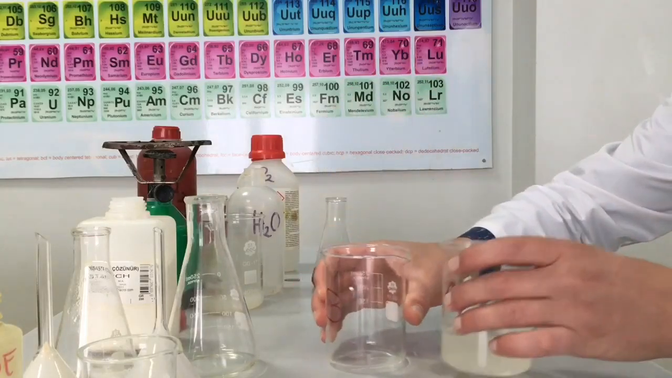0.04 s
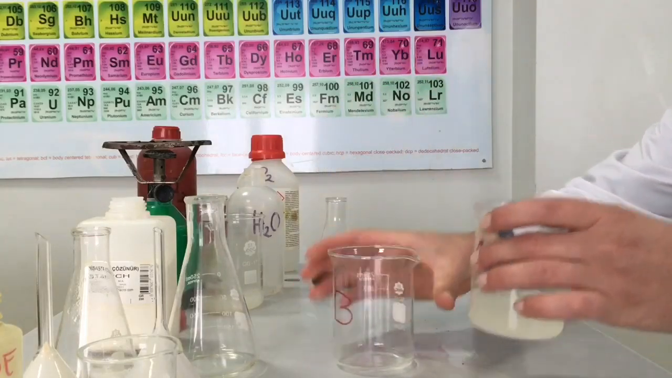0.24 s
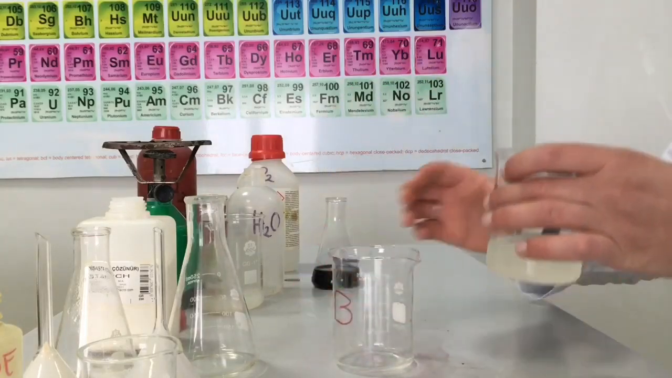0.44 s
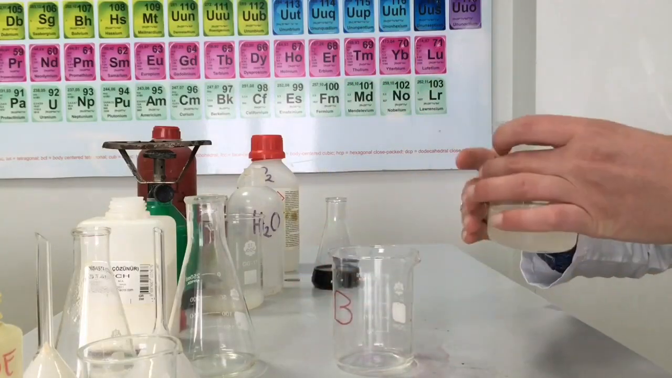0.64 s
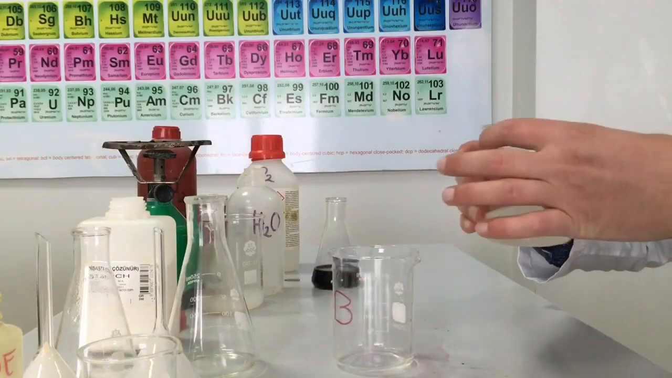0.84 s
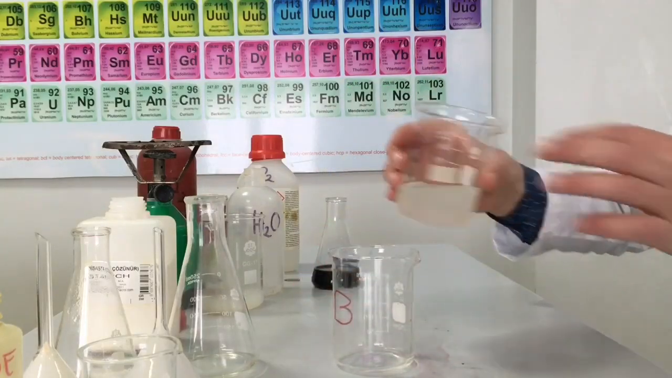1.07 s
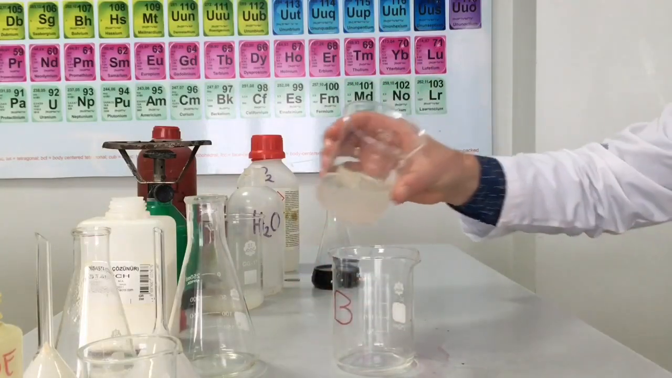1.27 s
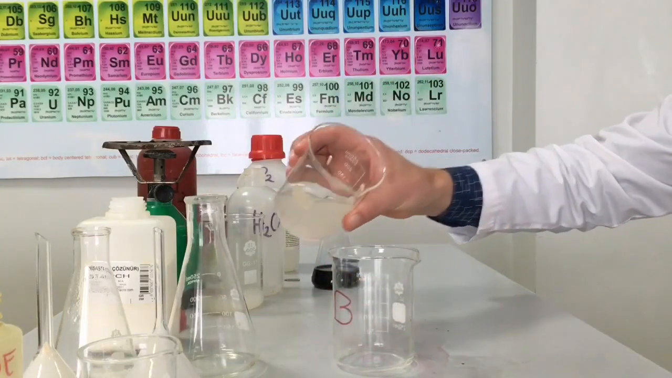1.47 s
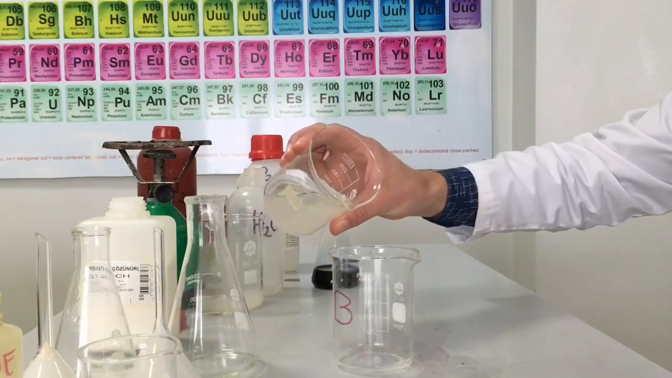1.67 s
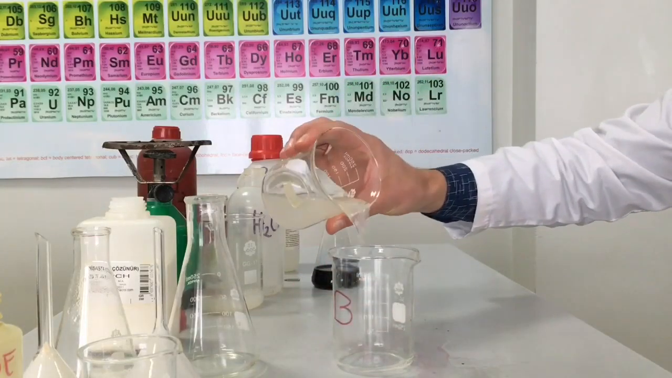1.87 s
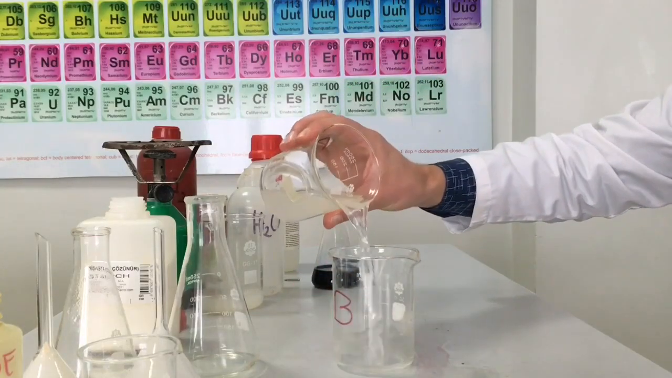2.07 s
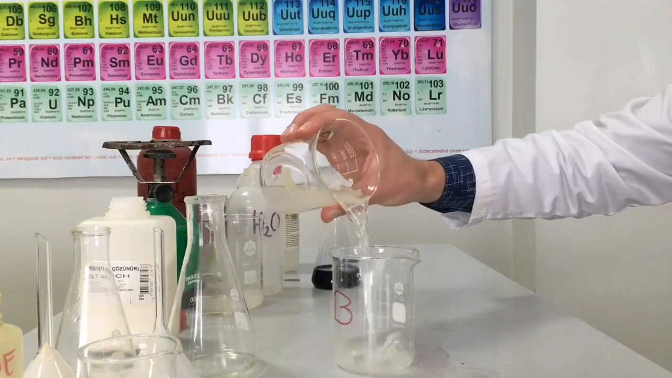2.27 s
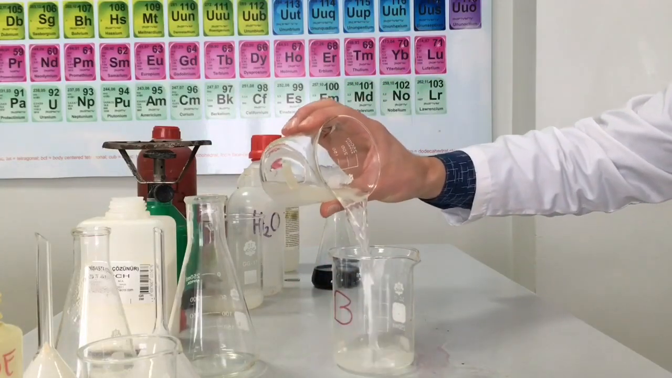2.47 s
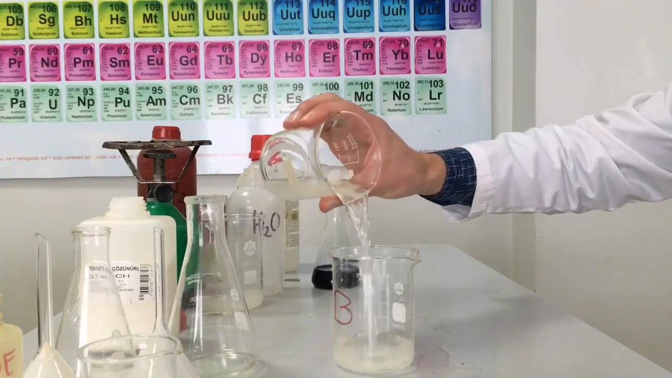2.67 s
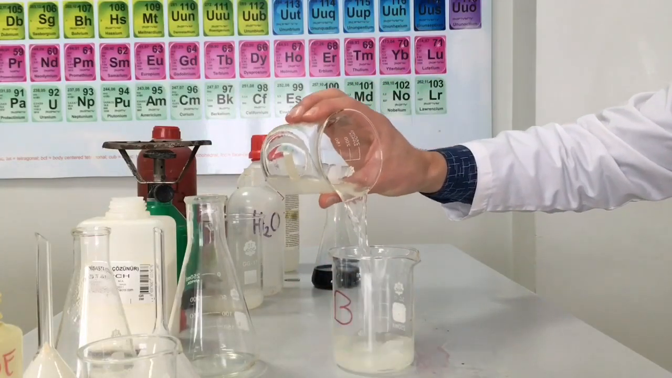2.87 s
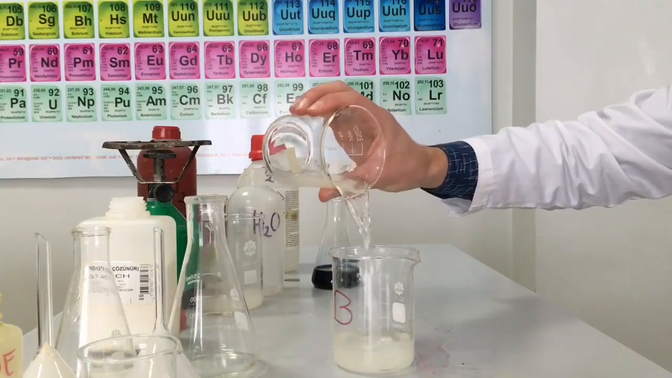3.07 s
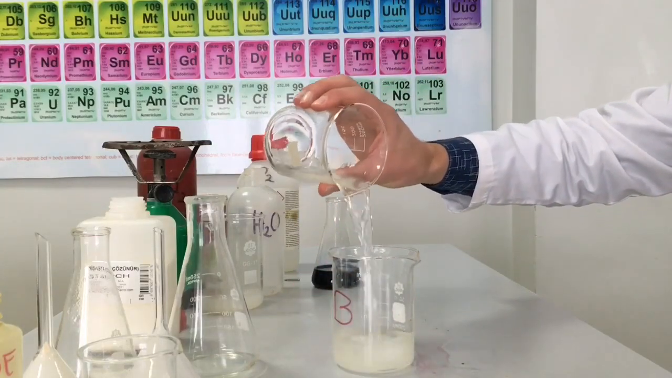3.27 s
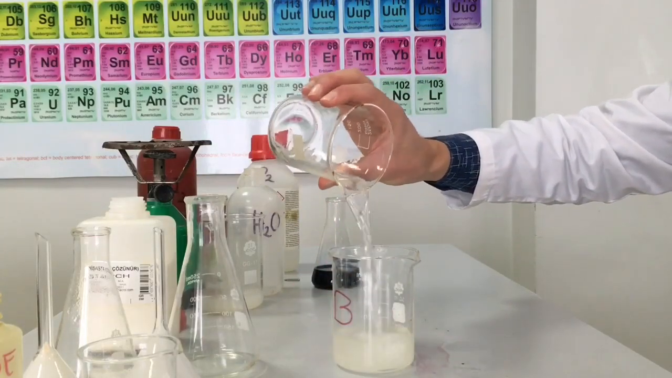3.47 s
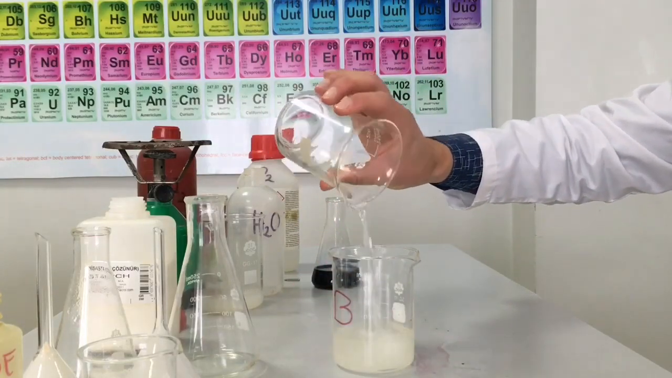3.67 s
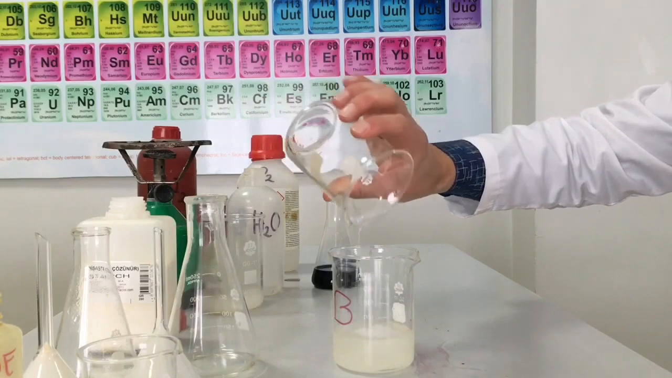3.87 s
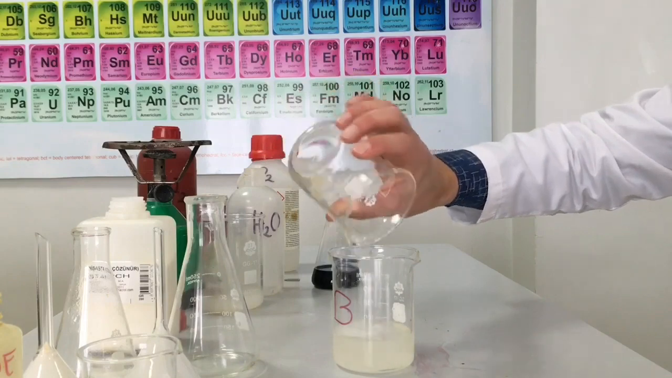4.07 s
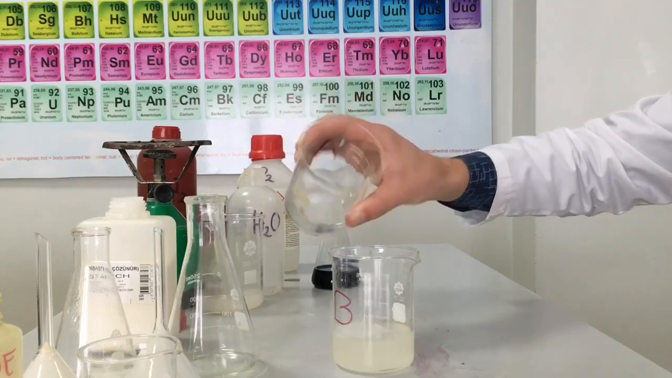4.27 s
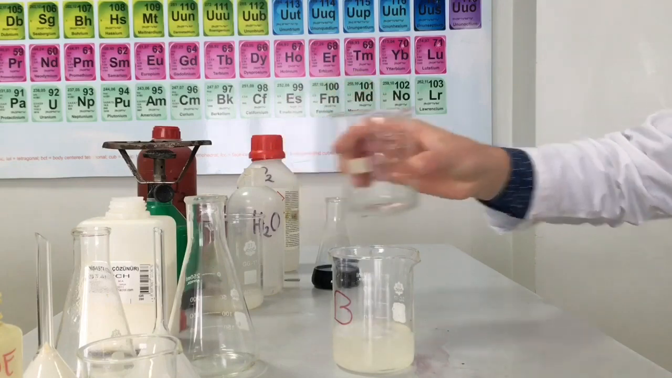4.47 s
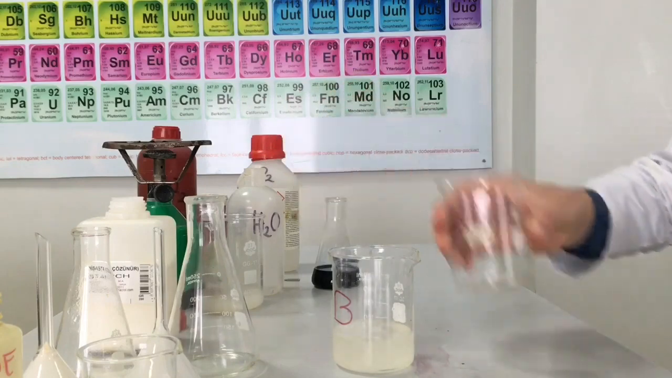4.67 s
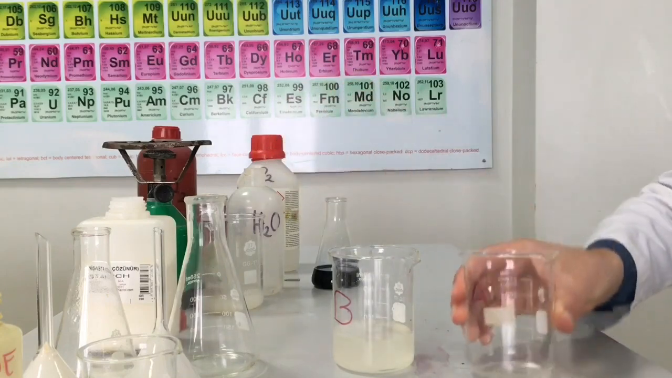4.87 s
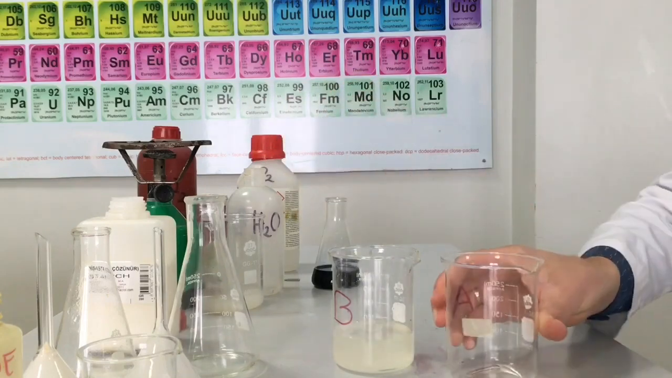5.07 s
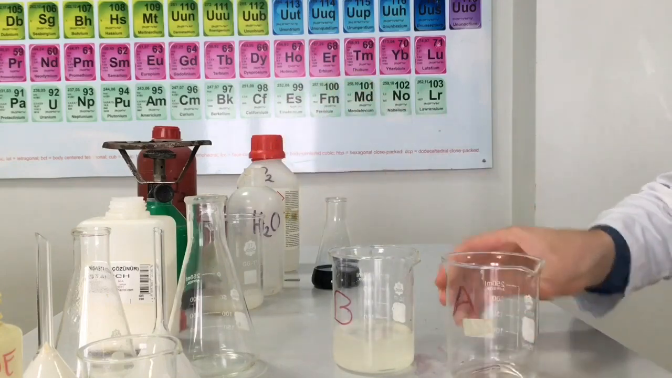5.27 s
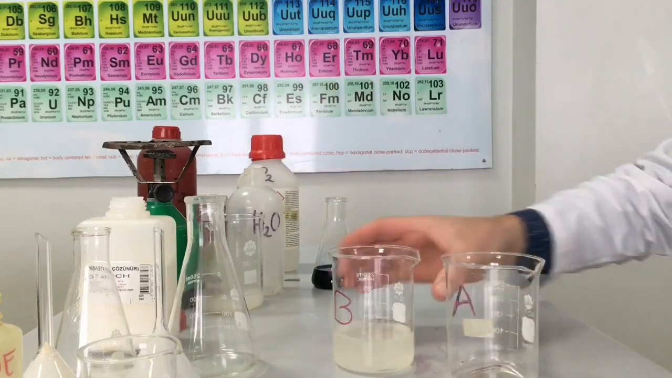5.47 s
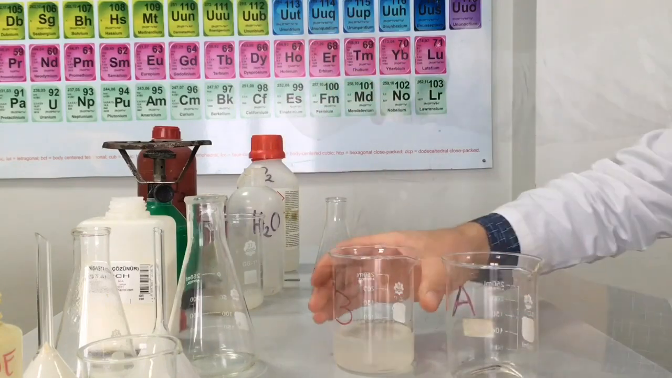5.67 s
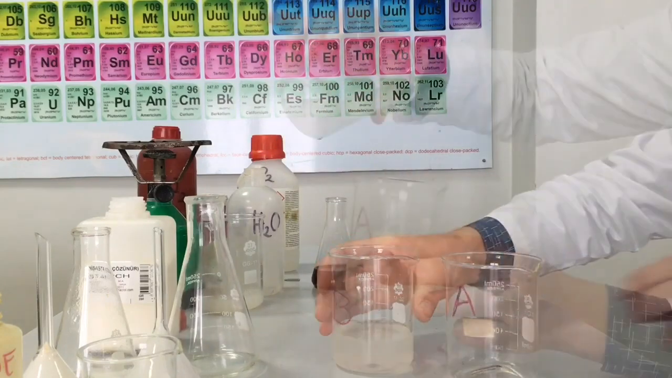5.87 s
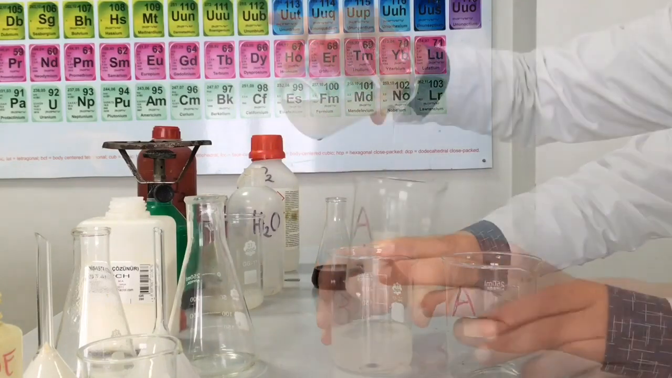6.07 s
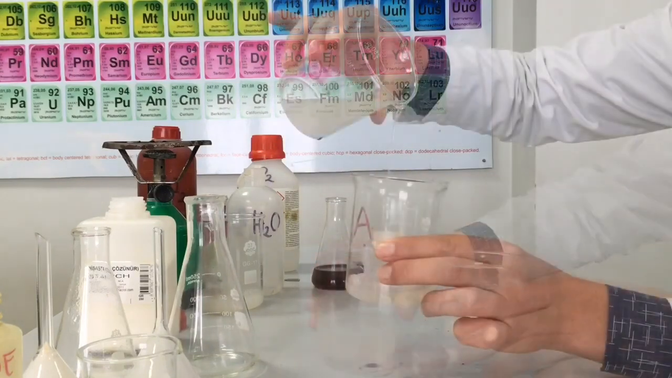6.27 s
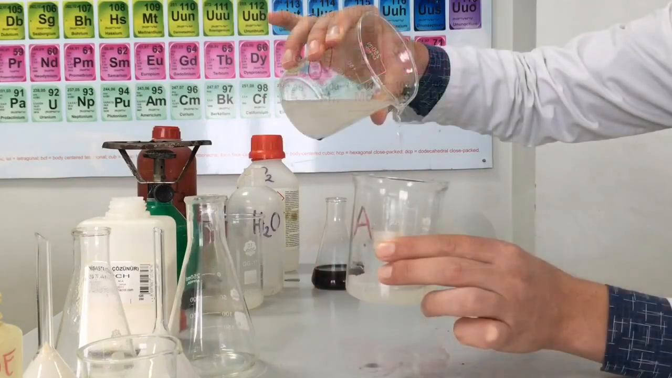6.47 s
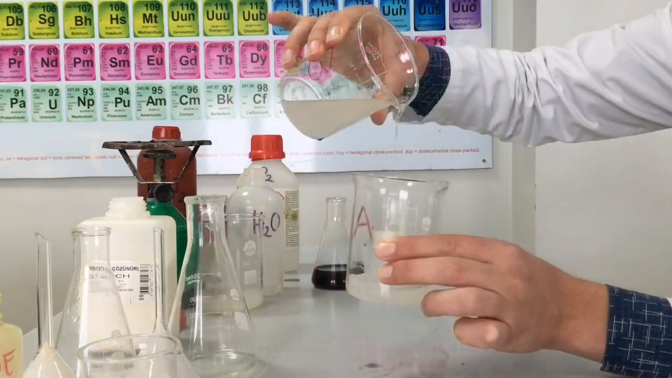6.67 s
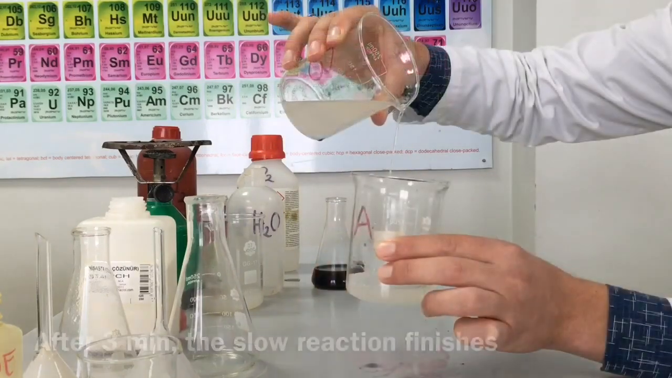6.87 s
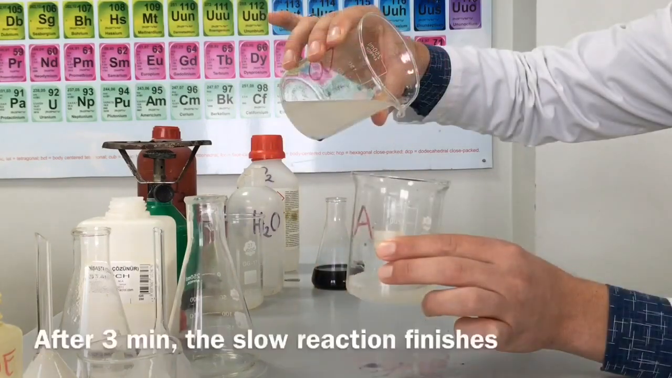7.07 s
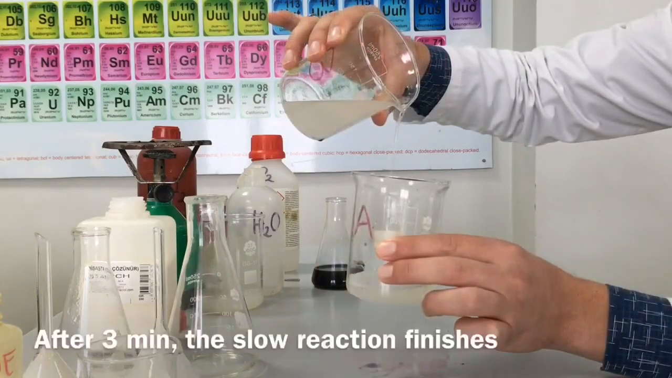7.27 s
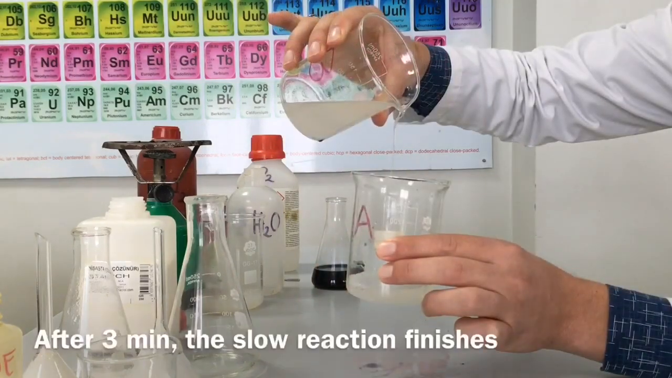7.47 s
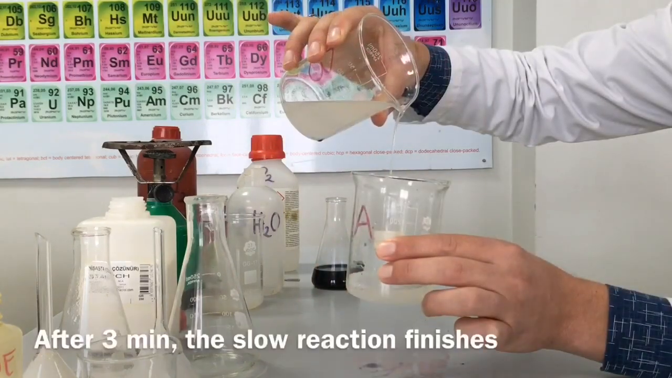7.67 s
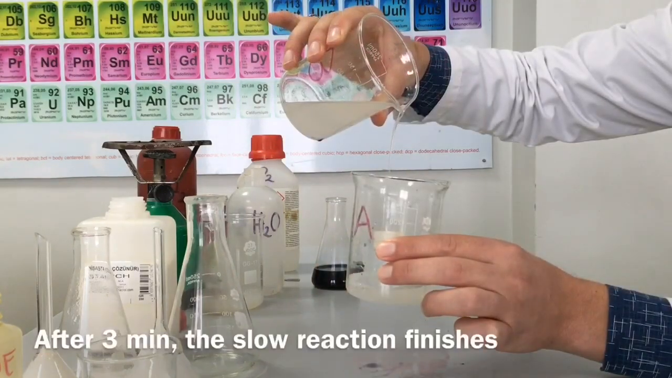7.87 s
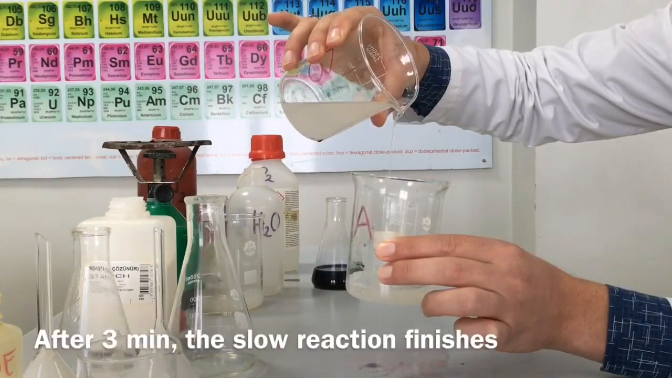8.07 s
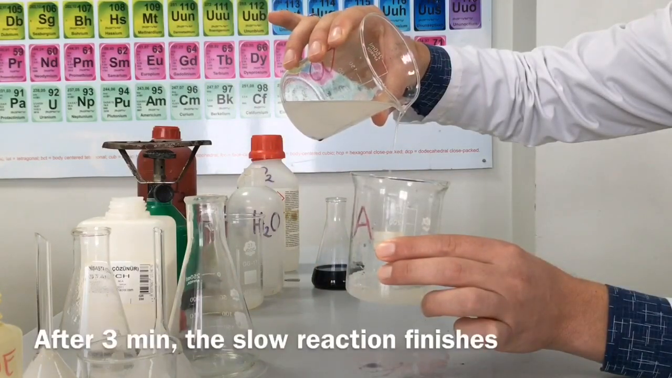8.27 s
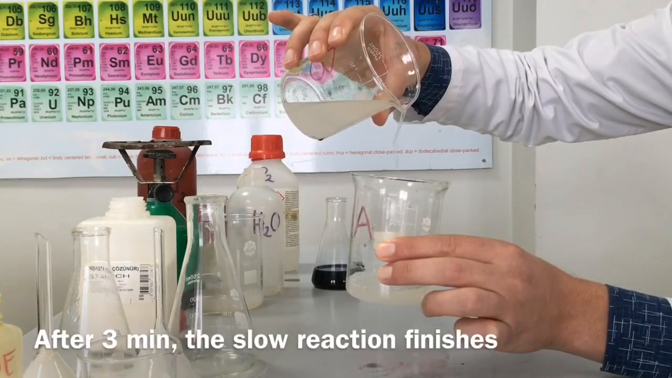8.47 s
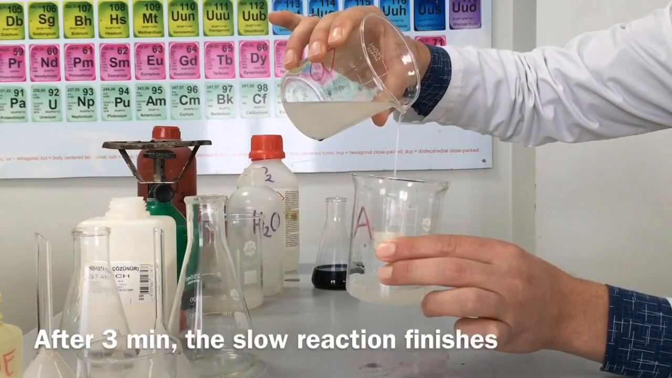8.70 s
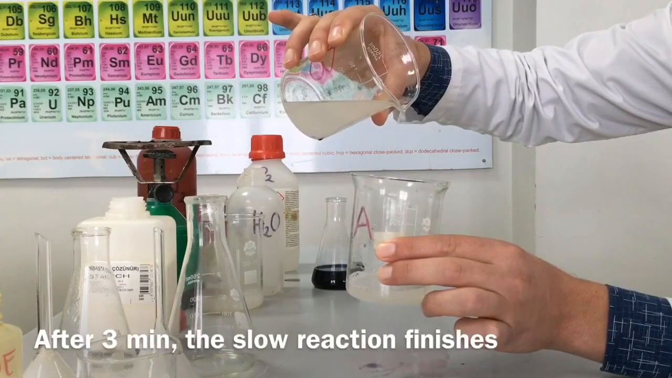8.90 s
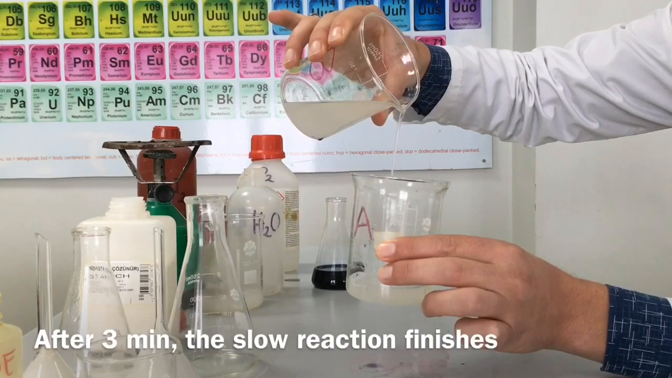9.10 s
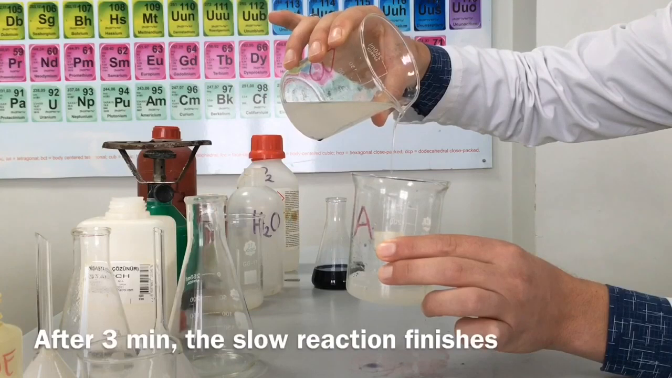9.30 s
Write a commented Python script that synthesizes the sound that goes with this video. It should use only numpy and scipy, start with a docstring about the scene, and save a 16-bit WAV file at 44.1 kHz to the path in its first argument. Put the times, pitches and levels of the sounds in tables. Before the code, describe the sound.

Liquid gurgles and splashes into a glass beaker, an empty beaker knocks down on a bench, then a thin trickle drips into glass.

```python
"""Liquid is poured into a glass beaker, gurgling and fizzing as trapped air bubbles ring.
The empty beaker is set down on a lab bench with a knock and rocks back, shaking bench and glass.
Then a thin trickle drips into a held glass and rings its wall. Faint tinkles, a rustling sleeve
and a short scrape come from the handling. The hard room echoes, and the ventilation hums."""
import sys
import numpy as np
from scipy import signal
from scipy.fft import rfft, irfft
from scipy.io import wavfile
from scipy.ndimage import uniform_filter1d

SR = 44100
rng = np.random.default_rng(int(sys.argv[2]) if len(sys.argv) > 2 else 0)


def digitize_waveform(pressure):
    """Quantize a signal to 16-bit integers and store it at the path in sys.argv[1].

    Rows of a 2-D input are taken as channels; values are limited to [-1, 1].
    """
    field = np.atleast_2d(pressure).T
    bounded = np.clip(field, -1, 1)
    quanta = np.round(bounded * 32767).astype(np.int16)
    wavfile.write(sys.argv[1], SR, quanta)


N = 411894
LEAD = SR // 2  # extra samples before time zero, so an earlier sound can leave its echo
WALL_HZ = 3145  # the note of the glass that catches the liquid

# The poured stream. Each row: time in seconds, then deep gurgle, gurgle and fizz levels in dB.
STREAM = [(2.15, -75, -84, -90), (2.22, -89, -96, -63), (2.4, -72, -57, -70.5), (2.47, -67, -63, -70),
          (2.49, -58.5, -61, -59), (2.8, -73, -58, -61.5), (2.96, -88, -52.5, -65.5),
          (3.05, -58, -43.5, -66), (3.37, -56, -47, -65), (3.7, -54.5, -60.5, -69.5),
          (3.89, -57, -47.5, -69.5), (4.2, -106, -103, -101.5)]


def amp(db):
    """Turn decibels into a number to multiply by."""
    return 10 ** (np.asarray(db) / 20)


def evened(x):
    """Scale a signal to an average (rms) level of 1."""
    return x / np.sqrt(np.mean(x ** 2) + 1e-20)


def value_at(points, hz):
    """Read between the rows of a table of pitches and values."""
    pitch, value = np.transpose(points)
    return np.interp(np.log(hz + 1), np.log(pitch + 1), value)


def between(ends, share):
    """A pitch part of the way, in octaves, from one end to the other."""
    return ends[0] * (ends[1] / ends[0]) ** share


def add(mix, s, sound):
    """Mix in a sound starting at s seconds."""
    part = mix[LEAD + round(s * SR):][:len(sound)]
    part += sound[:len(part)]


def curves(rows):
    """Turn rows of seconds and dB levels into volume curves that fade at both ends."""
    s, *columns = np.transpose(rows)
    t = (np.arange(N + LEAD) - LEAD) / SR
    gate = np.clip(np.minimum(t - s[0], s[-1] - t) / 0.021, 0, 1)
    return [gate * amp(np.interp(t, s, db)) for db in columns]


def ring(hz, t60, glide=0, rise=0.00078):
    """A tone that fades by 60 dB in t60 seconds (its fade time) while its pitch rises by the share glide."""
    t = np.arange(int(t60 * SR) + 50) / SR
    envelope = amp(-60 * t / t60) * (1 - np.exp(-t / rise))
    return envelope * np.sin(2 * np.pi * hz * (t + glide * t ** 2 / (2 * t60)))


def rattle(colour, t60):
    """A dying burst of noise, shaped by a table of pitches and levels."""
    t, hz = np.arange(4096) / SR, np.fft.rfftfreq(4096, 1 / SR)
    noise = evened(irfft(rfft(rng.standard_normal(4096)) * amp(value_at(colour, hz))))
    return amp(-60 * t / t60) * (1 - np.exp(-t / 0.0004)) * noise


def splat(hz, t60, tone_share=0.48, width=0.27):
    """A click: a very short ring in a dying puff of hiss around the same pitch."""
    rise = 2.3 / hz  # a couple of cycles
    tone = ring(hz, t60, 0.06, rise)
    t = np.arange(len(tone)) / SR
    hiss = signal.lfilter(*signal.iirpeak(hz, 1 / width, SR), rng.standard_normal(4000)[:len(t) + 200])
    hiss = evened(signal.lfilter(*signal.iirpeak(hz, .5 / width, SR), hiss))[200:]
    return tone_share * tone + (1 - tone_share) * hiss * amp(-60 * t / t60) * (1 - np.exp(-t / rise))


def bubbles(rows, pitches, levels_db, cycles, per_s, spread_db, glide, spurts):
    """Small bubbles of random size ring in spurts between the first and last times in rows."""
    first, length = LEAD + int(rows[0][0] * SR), int((rows[-1][0] - rows[0][0]) * SR)
    length = min(length, N + LEAD - first)
    chance, strength, which = rng.random((3, length))
    rush = np.exp(spurts * evened(uniform_filter1d(rng.standard_normal(length), 500)))
    born = chance < per_s / SR * rush / rush.mean()
    kicks = born * amp(spread_db * np.minimum(-np.log(strength + 1e-9), 4))
    part = np.zeros(length)
    for k, (hz, db) in enumerate(zip(pitches, levels_db)):
        own = kicks * (np.floor(which * len(pitches)) == k)
        part += amp(db) * np.sqrt(hz) * signal.oaconvolve(own, ring(hz, cycles / hz, glide))[:length]
    out = np.zeros(N + LEAD)
    out[first:first + length] = evened(part)
    return out


def resonate(x, peaks):
    """Bring out a few pitches at the same overall level. Each peak: pitch in Hz, width in Hz, dB."""
    out = sum(amp(db) * signal.lfilter(*signal.iirpeak(hz, hz / width, SR), x) for hz, width, db in peaks)
    return out * np.std(x) / np.std(out)


def thin_bass(x):
    """The ringing bench gives off little deep bass."""
    return signal.lfilter(*signal.butter(3, 190, "high", fs=SR), x)


def clunk():
    """A dull clunk just before the start; only its echo is heard."""
    # Each row: pitch in Hz, noise level in dB.
    colour = [(71, -61), (120, -44), (178, -11), (213, -6), (377, -7), (578, -7.5), (801, 2), (1490, -8.5),
              (2650, -28), (6000, -39), (7800, -75), (13200, -120)]
    out = np.zeros(N + LEAD)
    add(out, -0.1, amp(-18) * rattle(colour, t60=0.15))
    return thin_bass(out)


def ventilation():
    """Ventilation rumble and a faint hiss, with patches that drift a little in level."""
    # Each row: pitch in Hz, noise level in dB.
    colour = [(15, -75), (25, -14.5), (92, -10), (124, -16.5), (150, 0.5), (196, -8), (272, 0.5),
              (431, -14), (480, -18), (741, -18.5), (945, -17), (2190, -28), (2440, -32), (13100, -44),
              (16300, -45)]
    frames, hz = N // 256 + 5, np.fft.rfftfreq(1024, 1 / SR)
    real, imaginary, patches = rng.standard_normal((frames, 513, 3)).T
    patches = evened(uniform_filter1d(uniform_filter1d(patches, 10, 0), 30, 1))
    spectrum = (real + 1j * imaginary) * amp(value_at(colour, hz)[:, None] + 1.36 * patches)
    return amp(-54) * evened(signal.istft(spectrum, nperseg=1024, noverlap=768)[1][:N])


def tinkles():
    """A beaker tinkles faintly as it is lifted."""
    # Each row: start in seconds, level in dB, pitch in Hz.
    touches = [(0.134, -56, 6120), (.135, -61, 7600), (.135, -58, 12200), (.135, -63, 10300),
               (.06, -59, 8830), (.08, -61, 13400), (0.653, -68, 7000)]
    out = np.zeros(N + LEAD)
    for s, db, hz in touches:
        add(out, s, amp(db) * splat(hz, t60=0.08))
    return out


def sleeve():
    """Cloth hisses softly as the arm lifts."""
    # Each row: time in seconds, level in dB.
    levels = [(0.9, -85), (1.21, -74), (1.75, -87)]
    rustle, = curves(levels)
    hiss = signal.lfilter(*signal.butter(2, [2500, 14000], "band", fs=SR), rng.standard_normal(N + LEAD))
    return rustle * evened(hiss)


def drone():
    """A low tone swells and fades twice."""
    # One list per swell. Each row: time in seconds, pitch in Hz, level in dB.
    swells = [
        [(1.9, 87.2, -77), (2.09, 77.9, -69), (4.01, 77.8, -67), (4.2, 70.8, -75)],
        [(6.8, 62.8, -90), (7.1, 67.4, -65), (7.9, 67.6, -58), (8.93, 69.1, -71.5), (9.3, 63, -61)],
    ]
    out, t = np.zeros(N), np.arange(N) / SR
    for rows in swells:
        s, hz, db = np.transpose(rows)
        gate = np.clip(np.minimum(t - s[0], s[-1] - t) / 0.17, 0, 1)
        tone = np.sqrt(2) * np.sin(2 * np.pi * np.cumsum(np.interp(t, s, hz)) / SR)
        out += gate * amp(np.interp(t, s, db)) * tone
    return out


def pouring():
    """Bubbles gurgle in the beaker's air space under a fizz of small ones; large ones stand out."""
    # Air pockets in the liquid, then the beaker's air space. Each row: pitch in Hz, width in Hz, dB.
    pockets = [(371.5, 4.7, 25), (553, 110, 5.5)]
    air_space = [(674, 63, -1), (856, 64, -9), (940, 123, 10.5), (1146, 43, 3), (1620, 120, -41)]
    # Each row: pitch in Hz, fizz strength in dB per Hz.
    fizz_colour = [(880, -31), (1500, -12), (2080, -1), (3090, 0.5), (4120, -1.5), (5540, -1.5),
                   (10100, 0.5), (11000, -3.5), (16000, -3)]
    # Large bubbles. Each row: start in seconds, level in dB, pitch in Hz, fade time in seconds.
    glugs = [(2.37, -26.5, 802, .042), (2.504, -44, 835, 0.23), (2.536, -37.5, 930, 0.064),
             (2.684, -33, 1310, .037), (2.718, -41, 860, .066), (2.841, -38, 1320, 0.044),
             (2.87, -44, 865, 0.27), (2.871, -32.5, 1275, 0.024), (3.009, -35, 1230, .071),
             (3.048, -28.5, 1003, 0.045), (3.103, -21.5, 890, 0.02), (3.149, -25.5, 950, 0.03),
             (3.195, -32, 930, 0.073), (3.195, -38, 1294, 0.071), (3.286, -35.5, 934, 0.12),
             (3.286, -33.5, 531, .062), (3.287, -29.5, 1280, 0.04), (3.335, -30.5, 966, 0.07),
             (3.335, -32.5, 530, 0.13), (3.423, -23, 990, 0.016), (3.423, -32.5, 527, 0.086),
             (3.486, -28.5, 1020, 0.02), (3.486, -30, 525, 0.034), (3.644, -39.5, 930, 0.084),
             (3.644, -49.5, 515, 0.16), (3.772, -44.5, 484, 0.18), (3.842, -42.5, 469, 0.2),
             (3.958, -43, 824, 0.06), (4.09, -47, 850, .071)]
    deep, gurgle, fizz = curves(STREAM)
    clicks = bubbles(STREAM, np.geomspace(300, 1900, 10), np.zeros(10),
                     cycles=2.06, per_s=500, spread_db=2.8, glide=0.62, spurts=0.6)
    out = deep * resonate(clicks, pockets) + gurgle * resonate(clicks, air_space)
    pitches = np.geomspace(1500, 15000, 26)
    colour_db = value_at(fizz_colour, pitches) + 10 * np.log10(pitches)
    spray = bubbles(STREAM, pitches, colour_db,
                    cycles=14, per_s=15000, spread_db=2.2, glide=0.1, spurts=0.53)
    wall = resonate(spray, [(WALL_HZ * .99, 90, 0), (2250, 250, -4), (4150, 500, -6)])
    pings = bubbles(STREAM, pitches * 1.04, colour_db - 3 * np.log2(pitches / 1500),
                    cycles=74, per_s=700, spread_db=3.2, glide=0.036, spurts=1.0)
    out += fizz * (spray + amp(-12) * wall + amp(2.5) * pings)
    for s, db, hz, t60 in glugs:
        add(out, s, amp(db) * ring(hz, t60, glide=0.035, rise=0.0016))
    return out


def splashes(small_count=30):
    """The stream makes wet clicks with fine spray; each also rings the glass wall."""
    # Each row: start in seconds, level in dB, pitch in Hz.
    large = [(2.1935, -40, 9500), (2.2073, -35.5, 7100), (2.221, -39, 5560), (2.2595, -37.5, 5880),
             (2.427, -40, 7240), (2.492, -34.5, 5100), (2.494, -44, 10500), (2.504, -34, 1700),
             (2.5064, -26, 3300), (2.7814, -45, 4160), (2.8192, -39, 2560), (2.9022, -43, 2680),
             (2.9157, -48, 3000), (3.0484, -44, 3050), (3.081, -38, 4070), (3.1008, -38, 3960),
             (3.1476, -34.5, 3220), (3.196, -39, 3880), (3.2435, -41, 4250), (3.3558, -46, 4170),
             (3.382, -33.5, 10500), (3.404, -36.5, 5010), (3.5006, -42, 10400), (3.632, -43.5, 4100),
             (3.738, -39, 4380), (3.7846, -46, 6860), (3.8045, -48, 12900), (3.8375, -36.5, 3260),
             (3.8365, -41, 9800), (3.838, -37.5, 1500), (3.8938, -37, 4400), (3.906, -39.5, 5700),
             (3.9318, -35, 4330)]
    small = [(np.interp(when, [0, 1], (2.5, 3.9)), -46 + 8.8 * (loud - .5), between((2600, 4400), pitch))
             for when, loud, pitch in rng.random((small_count, 3))]
    out = np.zeros(N + LEAD)
    for s, db, hz in small + large:
        spray_db = -45.5 + 0.45 * (db + 39)
        add(out, s, amp(spray_db) * splat(between((10500, 15000), rng.random()), t60=0.0068))
        add(out, s, amp(db) * splat(hz, t60=0.017))
        # The wall answers best near its own note, and more softly as the liquid rises.
        wall_db = -10 - 9 * abs(np.log2(hz / WALL_HZ)) - 5 * (s - STREAM[0][0])
        add(out, s, amp(db + wall_db) * ring(WALL_HZ * .99, t60=0.094))
    return out


def knocks():
    """The beaker hits the bench and both ring; a longer contact makes the bench sound duller."""
    # Each row: start in seconds, blow in dB, glass ring and clatter in dB above the blow, contact in ms.
    blows = [(4.8889, -18, 8, 7, 0.7), (5.0421, -20, -8.5, -9, 0.85), (5.051, -32.5, 2, 7, 1.5),
             (6.18, -40.5, -15, -8, 1.2)]
    # Notes of the bench top and the empty beaker. Each row: pitch in Hz, dB, fade time in seconds.
    bench_notes = [(129, -33, 0.055), (243, -16.5, 0.36), (364, -3.5, 0.096), (515, -13, 0.078),
                   (619, -4.5, 0.22), (782, 10, 0.04), (980.3, 9, 0.1), (1074, 8.5, 0.041),
                   (1185, 11, 0.027), (1320, 6, 0.085), (1570, 14.5, 0.021), (1810, 9, 0.028),
                   (1990, 10, 0.022), (2400, -15, 0.0196), (3720, -14, 0.008)]
    glass_notes = [(5160, -16, 0.043), (5205, -44, 1.14), (9500, -23.5, 0.051), (9520, -51, 0.25),
                   (7600, -20.5, 0.006), (12200, -33, .003)]
    # The many small vibrations of bench and bottles. Each row: pitch in Hz, noise level in dB.
    clatter = [(88, -50), (150, -34.5), (637, -6.5), (790, -3), (1720, -12), (2920, -27.5), (5050, -30),
               (6910, -44), (9630, -69), (10200, -45), (16000, -56)]
    out, thumps = np.zeros((2, N + LEAD))
    for s, blow_db, glass_db, clatter_db, contact_ms in blows:
        for hz, db, t60 in bench_notes:
            dulling = 1 + (hz * contact_ms / 1000) ** 2
            add(out, s, amp(blow_db + db) * ring(hz, t60, rise=0.00049) / dulling)
        for hz, db, t60 in glass_notes:
            add(out, s, amp(blow_db + glass_db + db) * ring(hz, t60, rise=0.00015))
        add(out, s, amp(blow_db + clatter_db) * rattle(clatter, t60=0.044))
        add(thumps, s, amp(blow_db - 27.5) * ring(75.4, t60=0.27, rise=0.0032))  # the whole bench moves
    return thin_bass(out) + thumps


def trickle():
    """Fine drops patter on the held glass and slosh in its air space."""
    # Each row: time in seconds, patter level in dB, slosh level in dB.
    flow = [(5.65, -67.5, -93), (6.05, -73, -76), (6.31, -69, -51), (6.48, -63, -94), (6.67, -73.5, -59.5),
            (7.31, -74.5, -77), (7.64, -67, -77), (7.76, -68, -58.5), (7.93, -67, -75), (8.68, -80, -72),
            (8.77, -58.5, -59.5), (9.15, -81, -88), (9.34, -58.5, -63)]
    patter, slosh = curves(flow)
    taps = bubbles(flow, np.geomspace(1800, 7500, 8), np.zeros(8),
                   cycles=3.5, per_s=900, spread_db=3.4, glide=0.21, spurts=0.59)
    gulps = bubbles(flow, np.geomspace(480, 1400, 10), np.zeros(10),
                    cycles=6.2, per_s=400, spread_db=1.6, glide=0.2, spurts=0.46)
    wall = resonate(taps, [(WALL_HZ, 60, -3), (3650, 200, -1.5), (6600, 400, -3), (2300, 700, -4)])
    hollow = resonate(gulps, [(560, 700, -1), (805, 97, -8.5), (1250, 360, -14)])
    return patter * wall + slosh * hollow


def bursting_bubbles():
    """Bubbles chirp upward as they burst at the surface."""
    # Each row: start in seconds, level in dB, first pitch in Hz, glide share, fade time in seconds.
    chirps = [(5.767, -40, 1250, 1.8, 0.066), (5.867, -60, 1670, .5, .03), (6.345, -38, 1910, 0.6, 0.032),
              (6.427, -37, 1292, 3.4, 0.058), (7.036, -33, 1447, 3.1, 0.05),
              (8.372, -35, 1410, 0.79, 0.042)]
    out = np.zeros(N + LEAD)
    for s, db, hz, glide, t60 in chirps:
        add(out, s, amp(db) * ring(hz, t60, glide, rise=0.0095))
    return out


def dripping():
    """Each drop traps a bubble and rings two notes of the glass: the wall's note and an upper one."""
    # Each row: start in seconds, bubble's pitch in Hz and level in dB, upper glass note's level in dB.
    drops = [(5.7686, 1970, -54, -56), (5.8229, 1990, -56, -56), (5.8695, 1910, -45.5, -62),
             (6.176, 1355, -40, -47.5), (6.2103, 2490, -47.5, -58), (6.314, 1210, -60, -52.5),
             (6.3507, 2370, -48.5, -66), (6.4076, 2370, -63, -42), (6.4534, 2100, -50, -46.5),
             (6.4904, 2350, -54, -55), (6.5384, 2530, -45, -43.5), (6.9358, 1240, -55, -38.5),
             (7.0387, 2310, -44.5, -43), (7.078, 1850, -49, -54), (7.3875, 1100, -70, -57),
             (7.433, 2460, -38.5, -42.5), (7.5505, 2680, -56, -51), (7.566, 2630, -53, -42.5),
             (7.7069, 1750, -55, -47.5), (7.787, 2410, -41.5, -54), (7.804, 2450, -41, -47),
             (7.831, 2060, -48, -52), (7.925, 2460, -43, -48), (7.9688, 2620, -47, -44),
             (7.994, 2490, -48, -50), (8.0204, 2250, -42, -50), (8.1638, 2180, -51, -47.5),
             (8.2057, 2344, -44, -45), (8.373, 1616, -53, -55), (8.3905, 1770, -57, -52),
             (8.636, 1130, -74, -50), (8.6927, 1800, -42.5, -57), (8.7419, 1264, -40.5, -53),
             (8.782, 1770, -47, -64), (8.811, 1280, -44.5, -53), (8.858, 2430, -49, -46),
             (9.0032, 2385, -42, -55), (9.2282, 2170, -63, -50), (9.2781, 2550, -58, -46.5)]
    # Each row: time in seconds, upper glass note's pitch in Hz,
    # wall ring in dB above the louder of bubble and upper glass note.
    landing = [(5.95, 3730, -20), (6.21, 3680, -12), (6.31, 3520, -2), (6.42, 3560, -5.5),
               (6.93, 3520, -12), (7.07, 3600, -5), (7.43, 3550, 0.5), (7.56, 3600, -14), (7.75, 3550, -1),
               (8.37, 3520, -2.5), (8.39, 3520, 9.5), (8.64, 3770, -9), (8.88, 3680, -26), (9.05, 3480, -9)]
    when, upper_pitches, wall_levels = np.transpose(landing)
    out = np.zeros(N + LEAD)
    for s, bubble_hz, bubble_db, upper_db in drops:
        upper_hz = np.interp(s, when, upper_pitches) * (1 + rng.uniform(-0.02, 0.02))
        wall_db = max(bubble_db, upper_db) + np.interp(s, when, wall_levels) + rng.uniform(-3, 3)
        add(out, s, amp(wall_db) * ring(WALL_HZ, t60=0.085, rise=0.00023))
        add(out, s, amp(bubble_db) * ring(bubble_hz, t60=0.037, glide=0.086, rise=0.0008))
        add(out, s, amp(bubble_db - 3.5) * splat(bubble_hz, t60=0.04))
        add(out, s, amp(upper_db) * ring(upper_hz, t60=0.058, glide=0.14, rise=0.0006))
        add(out, s, amp(upper_db - 3.5) * splat(upper_hz * 1.12, t60=0.021))
    return out


def spatter(trailing=2, mean_delay_s=0.05):
    """Droplets thrown at the wall ping and splat; faint ones trail each."""
    # Each row: start in seconds, ping level in dB, splat level in dB, splat pitch in Hz.
    droplets = [(6.1751, -48, -54, 8000), (6.236, -43, -40.5, 8200), (6.3584, -49, -43, 9050),
                (6.3924, -47, -43.5, 11300), (6.4814, -67, -50, 11100), (6.5702, -49, -44, 10600),
                (6.886, -68, -41, 9200), (6.9298, -49, -32.5, 9100), (6.9516, -49, -42, 9680),
                (7.0244, -47, -43, 9000), (7.1633, -39, -48, 11000), (7.3857, -39, -45, 7920),
                (7.4202, -50, -36.5, 11900), (7.4877, -51, -57, 10900), (7.6563, -46.5, -51, 10800),
                (7.7236, -60, -50, 8900), (7.7371, -54, -37, 9330), (7.786, -54, -52, 8750),
                (7.8543, -56, -48, 13500), (7.8872, -54, -48, 9700), (7.9245, -35.5, -47, 9150),
                (7.9537, -59, -42, 9000), (7.9671, -41, -50, 8870), (8.0223, -54, -50, 9300),
                (8.1606, -45.5, -53, 9000), (8.3658, -31.5, -46, 7800), (8.427, -57, -49, 11000),
                (8.5293, -56, -50, 8900), (8.537, -59, -51, 12200), (8.635, -50.5, -59, 8800),
                (8.743, -49, -49, 8870), (8.7802, -54, -48, 10700), (8.8092, -59, -42, 12000),
                (8.855, -62, -44, 11200), (8.8755, -45.5, -43, 5600), (9.2026, -42, -43, 12500),
                (9.242, -33, -40.5, 8850), (9.258, -55, -38, 5240), (9.2786, -57, -41.5, 9900)]
    faint = [(s - mean_delay_s * np.log(delay + 1e-9), -60.5 + 13 * (ping - .5),
              -57.5 + 13 * (wet - .5), between((7540, 14100), pitch))
             for s, *_ in droplets for delay, ping, wet, pitch in rng.random((trailing, 4))]
    out = np.zeros(N + LEAD)
    for s, ping_db, splat_db, splat_hz in droplets + faint:
        ping_hz = 6590 * (1 + rng.uniform(-0.012, 0.012))
        add(out, s, amp(ping_db) * ring(ping_hz, t60=0.029, glide=0.032))
        add(out, s, amp(ping_db - 13) * splat(ping_hz * .95, t60=0.023))
        add(out, s, amp(splat_db) * splat(splat_hz, t60=0.012))
        add(out, s, amp(splat_db - 6) * splat(12500, t60=0.004))
    return out


def scrape():
    """A glass slides briefly over the bench; the rubbing noise sounds its hollow."""
    # Each row: time in seconds, level in dB.
    levels = [(6.2, -67), (6.24, -50), (6.3, -61), (6.35, -68), (6.39, -67)]
    push, = curves(levels)
    rubbing = rng.standard_normal(N + LEAD)
    return push * resonate(rubbing, [(710, 99, 14), (570, 74, -10), (1150, 150, -21)])


def room(x):
    """Hard walls send back many small echoes; each pitch dies away at its own speed."""
    # Each row: pitch in Hz, fade time in seconds.
    fade_times = [(70, .5), (130, 2.5), (400, 1.59), (1000, 1.336), (2500, 1.19), (5000, 0.67),
                  (12000, 0.49)]
    echoes = np.zeros(2 * SR)
    slots = np.arange(300, 2 * SR - 20, 20)
    echoes[slots + rng.integers(0, 20, len(slots))] = rng.choice([-1., 1.], len(slots))
    hz, t, spectrum = signal.stft(echoes, SR, nperseg=256)
    tail = signal.istft(spectrum * amp(-60 * t / value_at(fade_times, hz)[:, None]), SR, nperseg=256)[1]
    tail[:300] = 0  # silence until the first echo
    return signal.fftconvolve(x, tail / np.linalg.norm(tail))[:len(x)]


def scene():
    """Glass and liquid echo in the room; sleeve, ventilation and drone are added without echo."""
    glass = clunk() + tinkles() + knocks() + scrape()
    liquid = pouring() + splashes() + trickle() + bursting_bubbles() + dripping() + spatter()
    heard = glass + liquid + sleeve() + amp(-7) * room(glass + liquid)
    return (heard[LEAD:] + ventilation() + drone())[None]


def record(dry):
    """The microphone drops the lowest bass and the highest treble."""
    thinned = signal.sosfilt(signal.butter(4, 38, "high", fs=SR, output="sos"), dry)
    treble_cut = signal.firwin(511, 16000, window=("kaiser", 9), fs=SR)
    return signal.oaconvolve(thinned, treble_cut[None], "same")


dry = scene()
out = record(dry)
digitize_waveform(out)
```